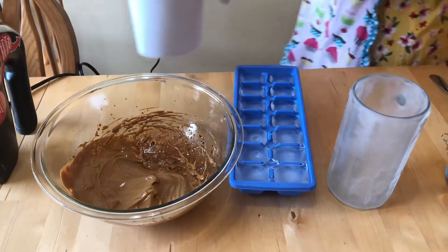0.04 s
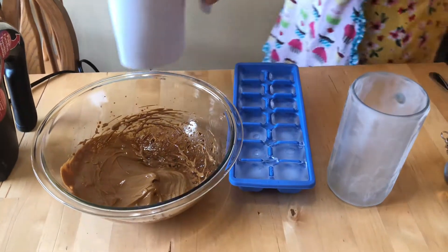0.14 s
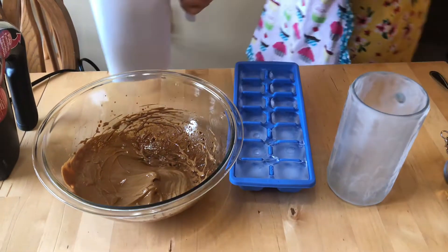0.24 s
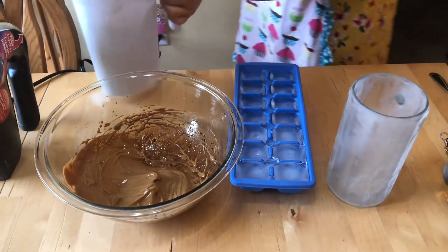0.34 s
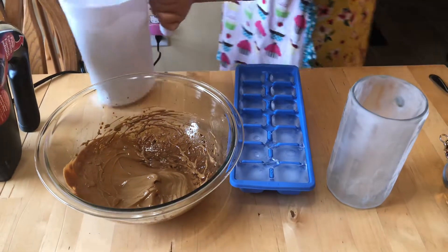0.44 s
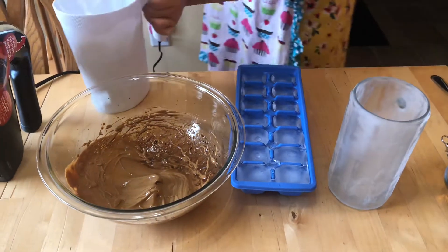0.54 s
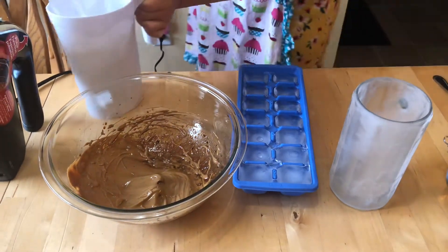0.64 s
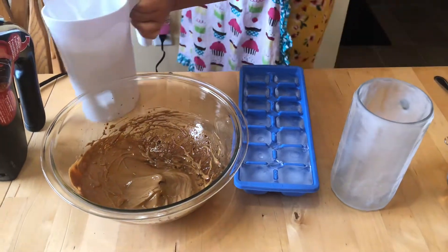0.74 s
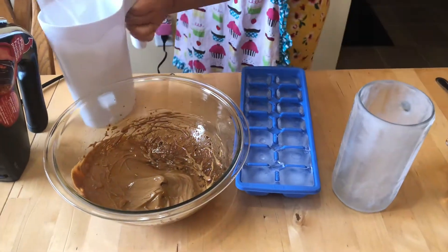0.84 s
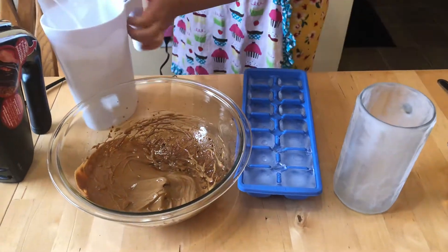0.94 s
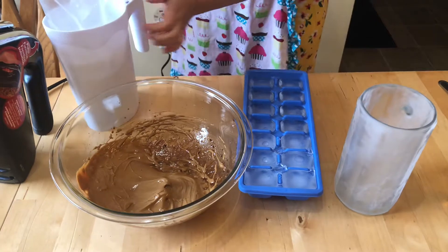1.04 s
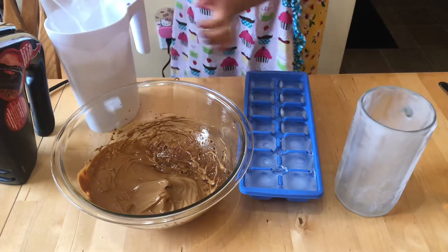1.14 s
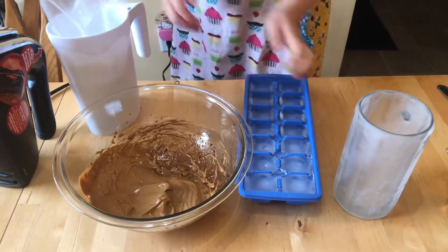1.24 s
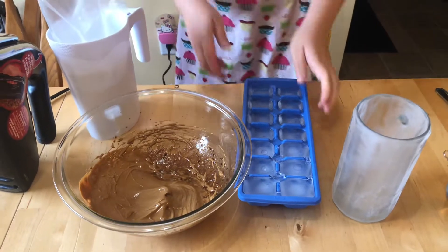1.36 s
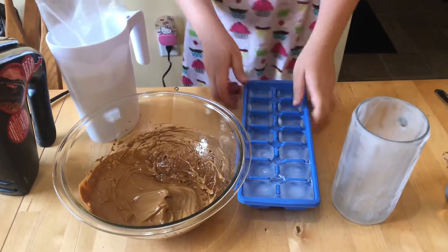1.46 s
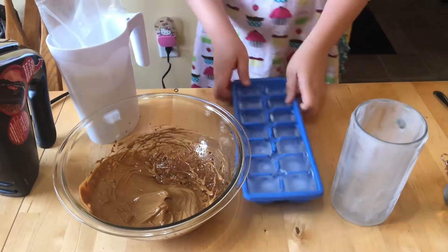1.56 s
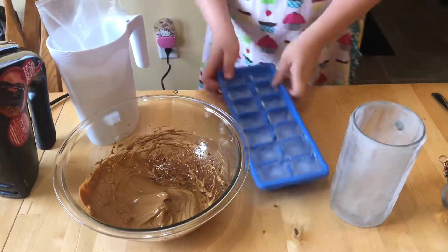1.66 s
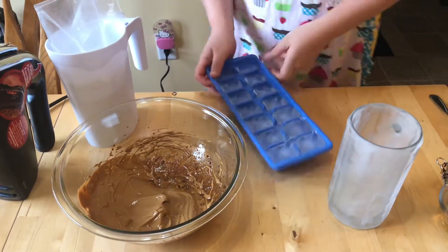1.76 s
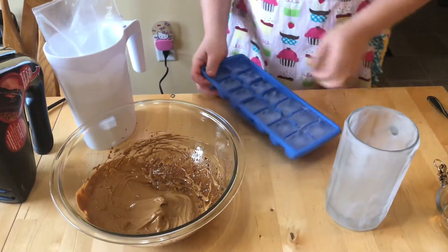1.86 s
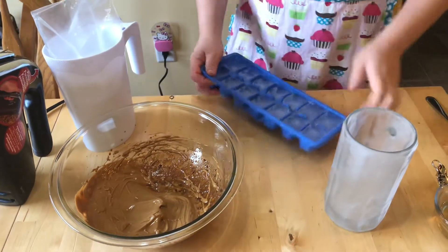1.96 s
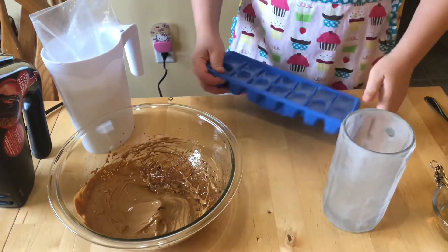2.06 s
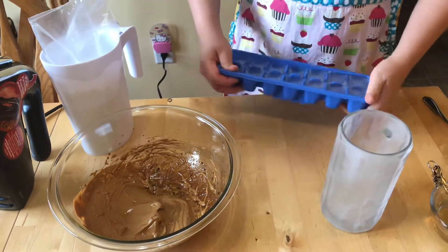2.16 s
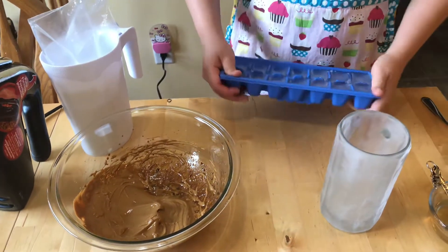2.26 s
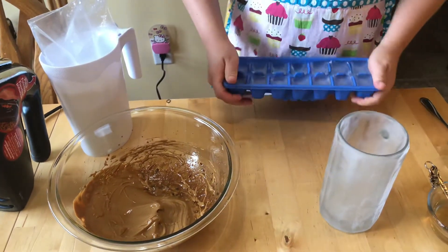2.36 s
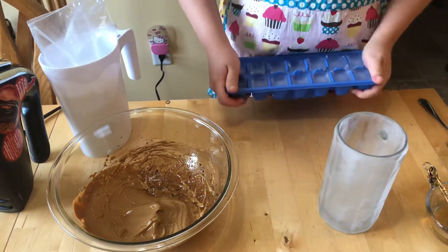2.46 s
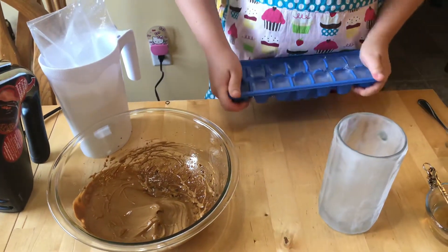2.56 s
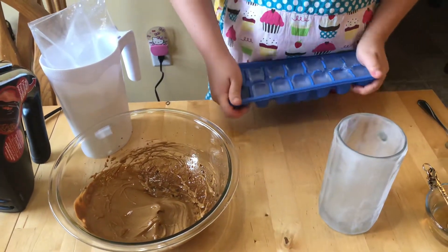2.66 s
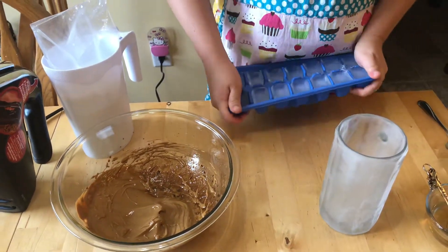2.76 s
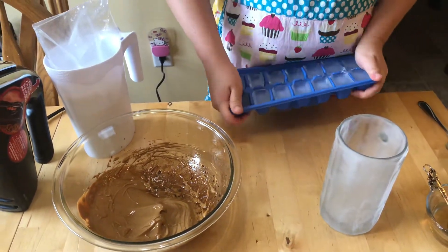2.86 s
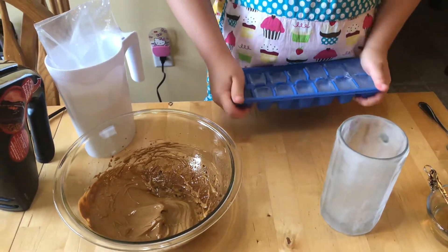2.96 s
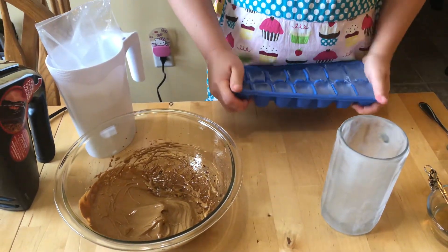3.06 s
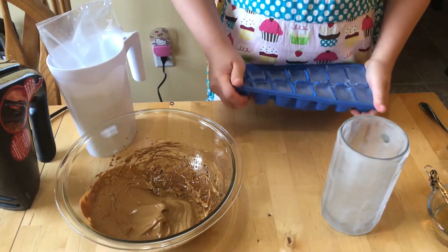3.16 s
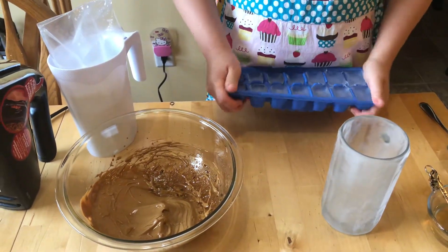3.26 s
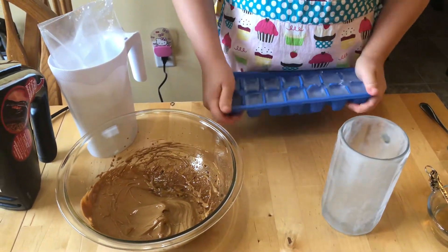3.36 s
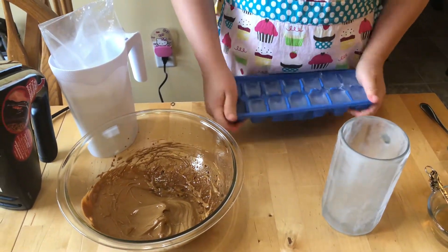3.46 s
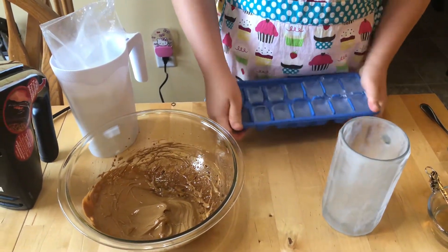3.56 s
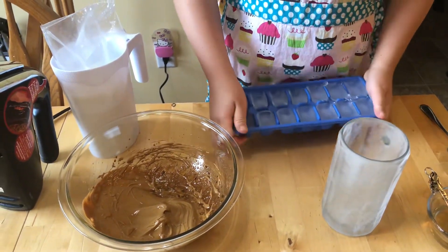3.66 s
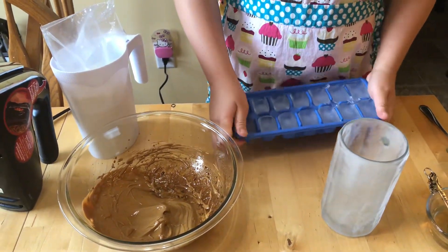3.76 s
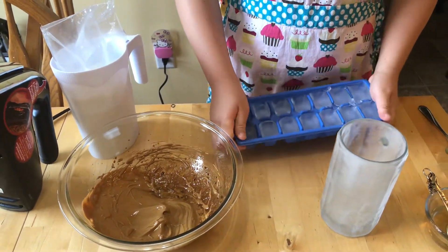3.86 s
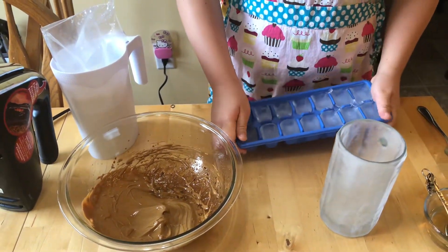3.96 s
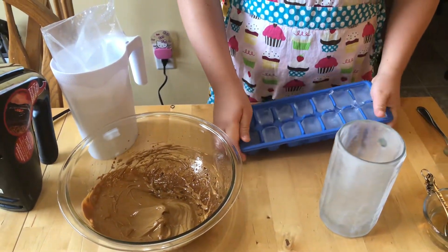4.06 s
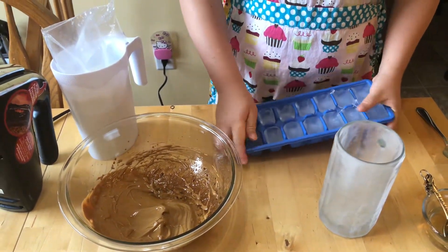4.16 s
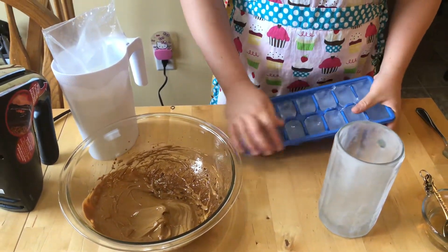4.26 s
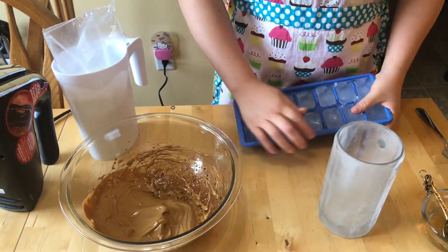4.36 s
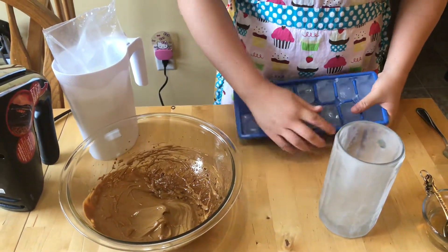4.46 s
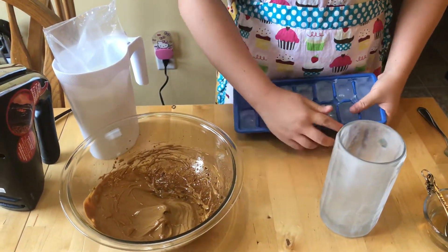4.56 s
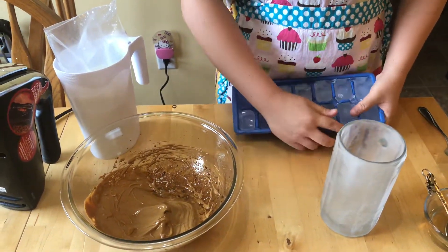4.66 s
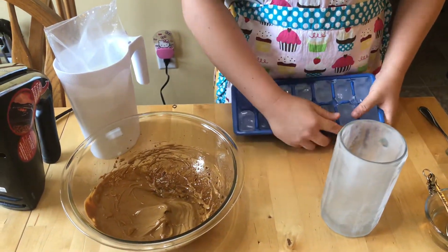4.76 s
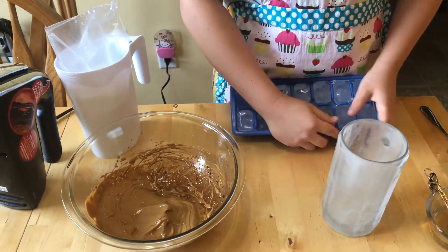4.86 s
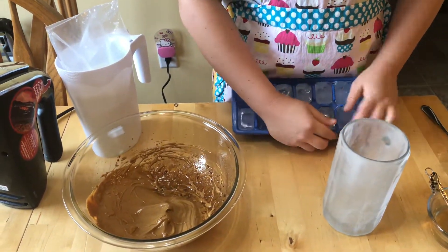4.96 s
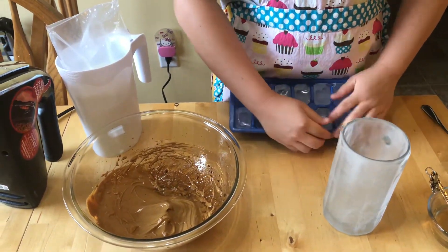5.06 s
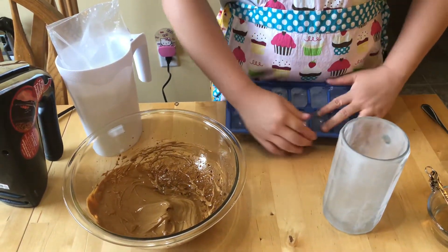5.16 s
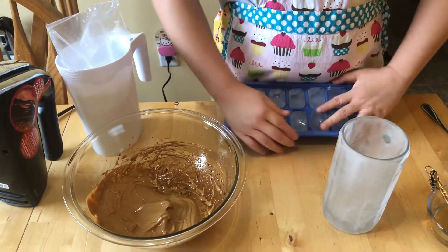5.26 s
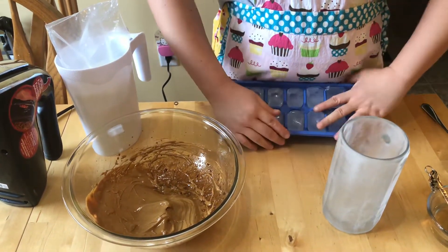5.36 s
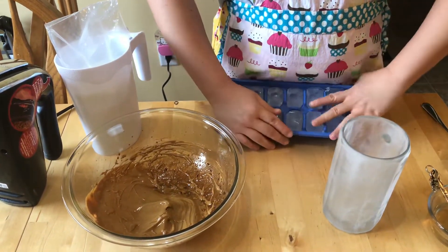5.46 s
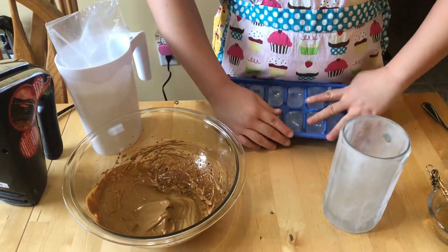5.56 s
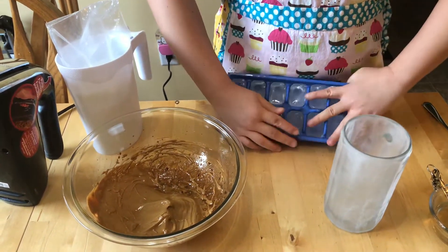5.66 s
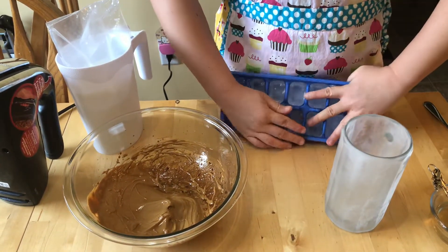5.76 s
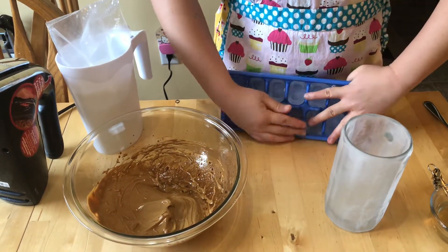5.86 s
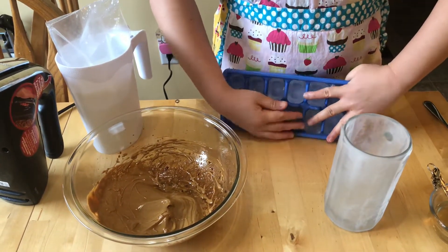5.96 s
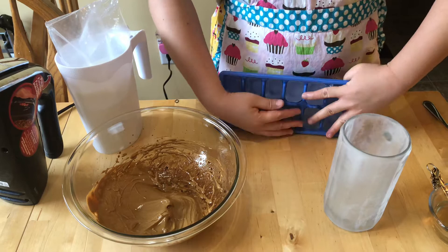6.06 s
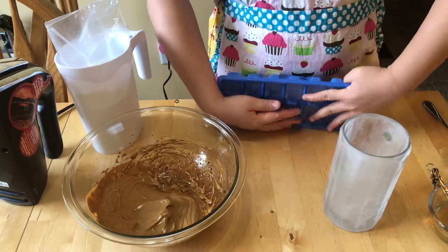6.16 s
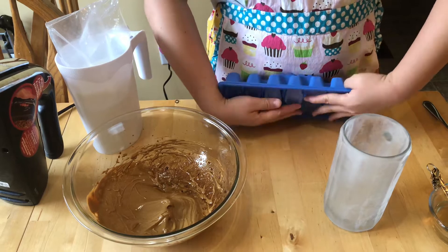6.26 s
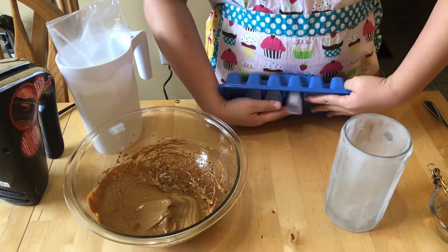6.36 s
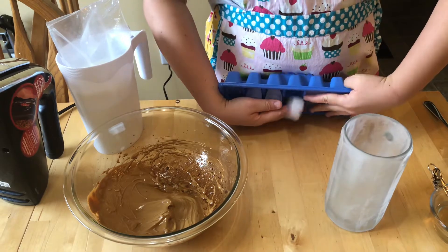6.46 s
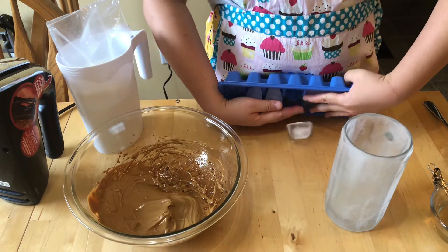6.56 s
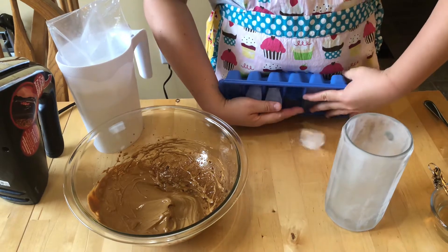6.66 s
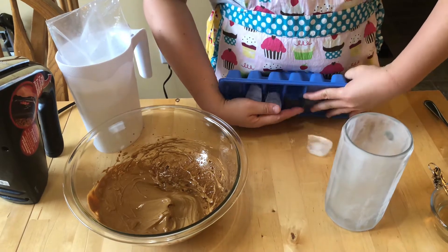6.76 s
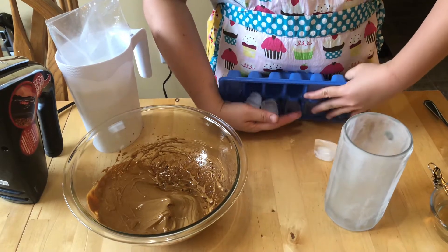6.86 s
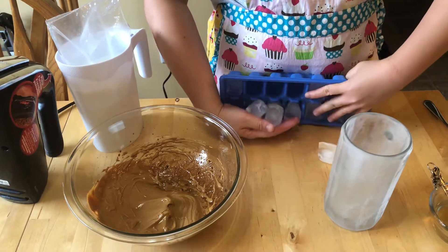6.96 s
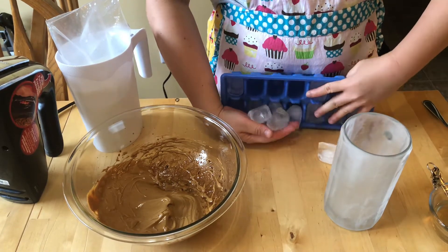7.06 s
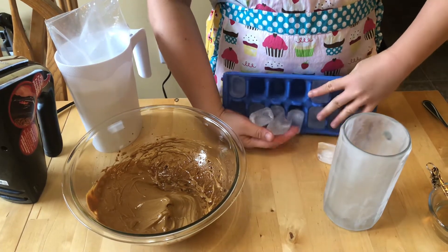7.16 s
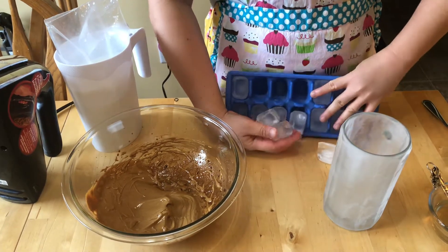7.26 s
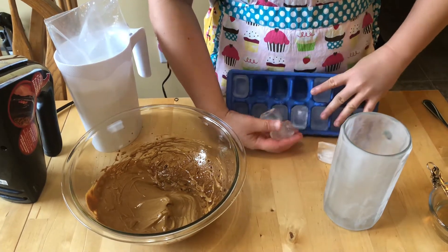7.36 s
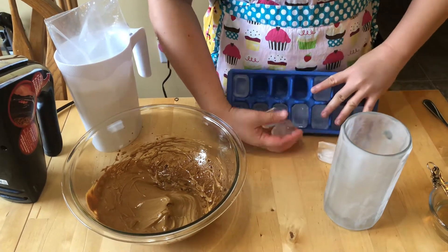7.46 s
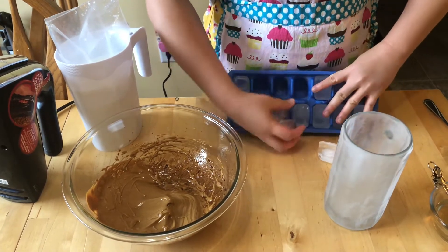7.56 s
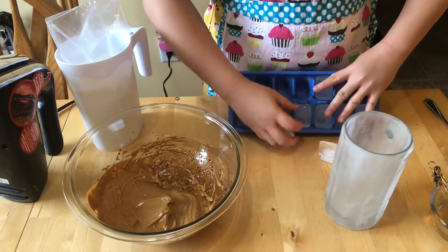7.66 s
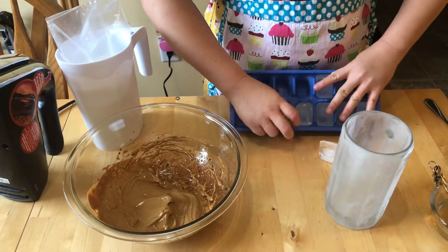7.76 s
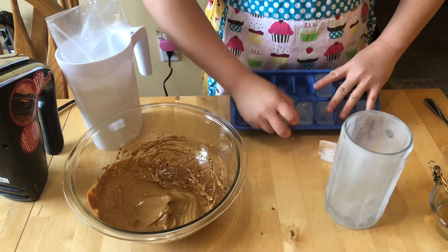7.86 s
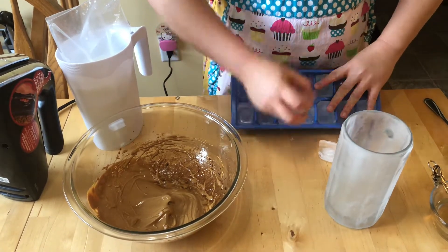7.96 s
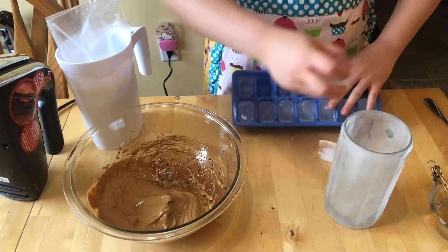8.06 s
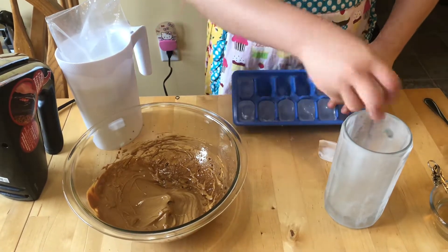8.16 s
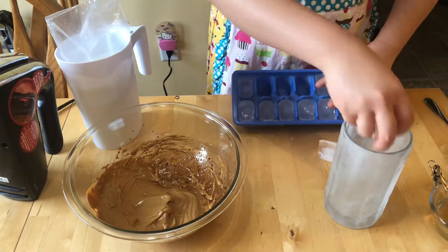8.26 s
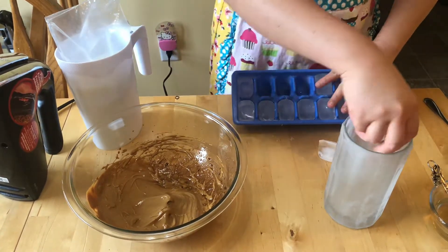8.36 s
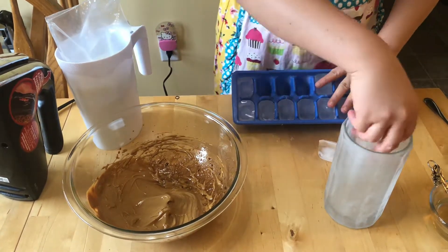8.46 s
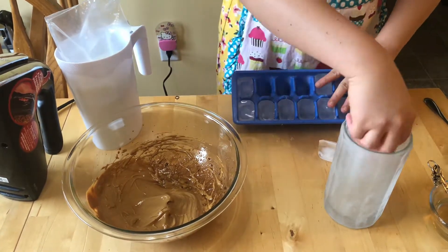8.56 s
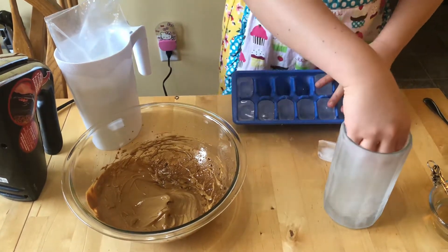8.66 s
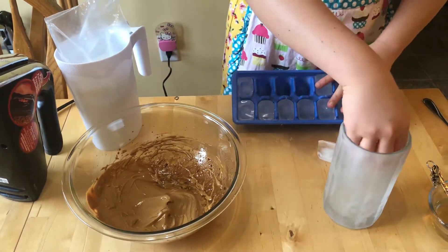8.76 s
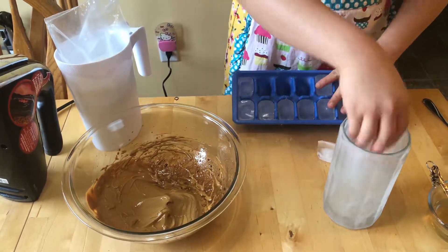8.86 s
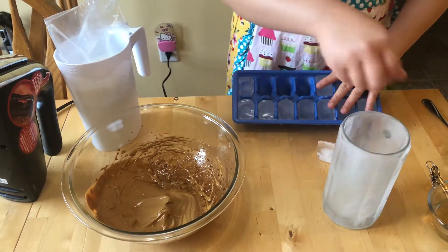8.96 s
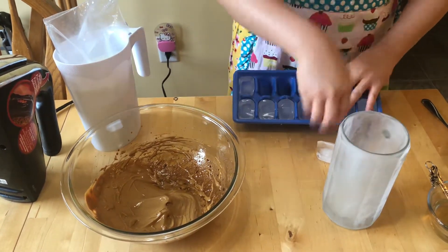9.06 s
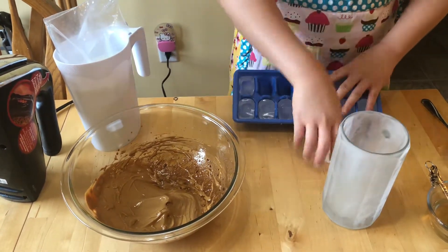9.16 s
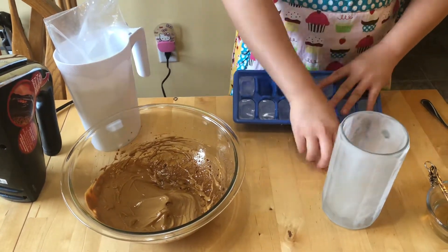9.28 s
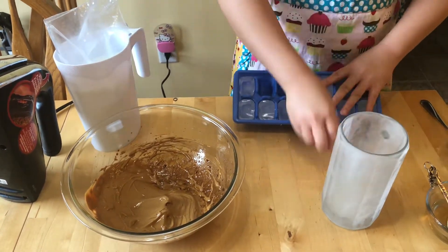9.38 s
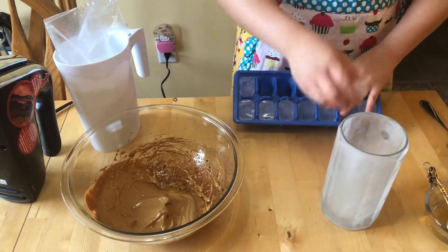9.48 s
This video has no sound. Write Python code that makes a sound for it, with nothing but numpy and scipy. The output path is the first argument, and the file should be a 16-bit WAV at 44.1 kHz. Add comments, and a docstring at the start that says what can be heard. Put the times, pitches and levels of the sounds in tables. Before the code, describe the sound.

Close, lightly echoing kitchen sound over steady low humming: a hollow jug knock with small rocking taps, plastic dragging on wood, then a sudden crisp crackle as ice breaks loose. Sparse ticks and soft plastic creaks while fingers pry; a heavy wooden knock with quick bounces as a cube falls; ice rattling in the tray; finally hard clacks and brief bright ringing of cubes landing in a glass.

```python
"""A kitchen with a humming fridge: a plastic jug is set on the wooden table, an ice tray is dragged near and
twisted so that the ice cracks, fingers pry the cubes out, one bounces on the table, the rest drop into a glass.
Sine tones and shaped noise make the fridge, noise grains the frost, filtered noise the rubbing and creaks;
short pushes and noise bursts through resonances make the jug, ice, wood and clacks; decaying sines ring the glass.
A diffuse echo surrounds all the handling and blows."""
import sys
import numpy as np
from scipy import signal
from scipy.fft import rfft, irfft, next_fast_len
from scipy.io import wavfile
from scipy.ndimage import uniform_filter1d, map_coordinates

SR = 44100
rng = np.random.default_rng(int(sys.argv[2]) if len(sys.argv) > 2 else 0)


def wav_record(signal):
    """Record a signal, one row per channel, as 16-bit PCM in the file named by sys.argv[1]."""
    frames = np.transpose(np.atleast_2d(signal))
    bounded = np.clip(frames, -1, 1)
    # unit amplitude maps onto the largest positive 16-bit level
    quanta = np.round(bounded * 32767).astype(np.int16)
    wavfile.write(sys.argv[1], SR, quanta)


N = 419832


def amp(db):
    """Decibels to gain."""
    return 10 ** (np.asarray(db) / 20)


def unit(x):
    """Scale to rms 1."""
    return x / np.sqrt(np.mean(x ** 2) + 1e-20)


def peak_one(x):
    """Scale to peak 1."""
    return x / np.abs(x).max()


def noise(count=N):
    """White noise."""
    return rng.standard_normal(count)


def along(points, hz):
    """Read (Hz, value) points on a log frequency axis."""
    point_hz, value = np.transpose(points)
    return np.interp(np.log(hz + 1), np.log(point_hz + 1), value)


def wobble(rate, count=N):
    """A smooth random curve, rate knots a second."""
    knots = noise(int(count * rate / SR) + 4)
    return map_coordinates(knots, [np.arange(count) * rate / SR])


def filtered(x, response):
    """Multiply the spectrum of x by a complex response of frequency."""
    m = next_fast_len(len(x) + 8192)
    return irfft(rfft(x, m) * response(np.fft.rfftfreq(m, 1 / SR)), m)[:len(x)]


def resonant(peaks):
    """Causal response of (Hz, width Hz, dB) resonances, summed with alternating sign."""
    def response(f):
        total = 0
        for k, (centre, width, db) in enumerate(peaks):
            damping = 1j * f * width
            total = total + (-1) ** k * amp(db) * damping / (centre * centre - f * f + damping)
        return total
    return response


def burst(t60, response, rise=0.00016):
    """A puff of dying noise through a response, peak 1."""
    t = np.arange(SR // 5) / SR
    envelope = amp(-60 * t / t60) * (1 - np.exp(-t / rise))
    return peak_one(filtered(envelope * noise(len(t)), response))


def blow(contact_s, response):
    """One short push, strongest at contact_s, through a response, peak 1."""
    t = np.arange(SR // 5) / SR
    return peak_one(filtered(t * np.exp(-t / contact_s), response))


def add(track, s, sound):
    """Mix a sound in at time s."""
    part = track[round(s * SR):][:len(sound)]
    part += sound[:len(part)]


SNAP_T60_S, SNAP_SHORTENS = 0.021, 0.011  # decay at -23.5 dB; about the share lost for each dB louder


def crack(db, hz):
    """A wide crack of a few ms; harder ones are shorter."""
    t60 = SNAP_T60_S * np.exp(-SNAP_SHORTENS * (db + 23.5))
    return amp(db) * burst(t60, resonant([(hz, 0.5 * hz, 0.5), (12000, 9000, -8)]))


# Fridge tones, before they waver: pitch_hz, peak_level_db
FRIDGE_TONES = [(57.8, -65.5), (59.2, -54.5), (188.4, -48.5), (247.6, -50), (301.5, -62)]
# Colour of the room noise: frequency_hz, density_db (relative, per Hz)
ROOM_NOISE = [(53, -23), (90, -19), (191, 0), (218, -3), (253, -14), (276, -12.5), (382, -26.5),
              (528, -18.5), (729, -28), (6170, -43), (7180, -44.5), (9500, -48.5), (15700, -47.5),
              (16100, -63)]
ROOM_NOISE_DB = -63  # rms above 400 Hz, clear of the hum, about which the level drifts


def fridge():
    """Compressor tones, the higher ones wavering more, over the noise of the room."""
    t = np.arange(N) / SR
    tones = np.zeros(N)
    for hz, db in FRIDGE_TONES:
        level = amp(db + hz / 130 * wobble(8))
        tones += level * np.sin(2 * np.pi * hz * t + hz / 300 * wobble(6))
    air = filtered(noise(), lambda hz: amp(along(ROOM_NOISE, hz)))
    air /= np.std(filtered(air, lambda hz: hz > 400))
    return tones + amp(ROOM_NOISE_DB + 1.4 * wobble(2.6)) * air


EDGE_DB = 20  # swell and fade times are for this many dB


def shape(s, swell, hold, fade):
    """Gain of one gesture, a value a millisecond: swell, hold, fade, straight in dB."""
    t = np.arange(N * 1000 // SR + 1) / 1000 - s
    before = np.maximum(-t, 0) / swell
    after = np.maximum(t - hold, 0) / fade
    return amp(-EDGE_DB * (before + after))


PATCHY_DB = 1.8  # the crackle changes colour from moment to moment


def patchy(x):
    """Random gain patches, about 1 kHz by 40 ms."""
    z = signal.stft(x, nperseg=256)[2]
    field = uniform_filter1d(rng.standard_normal(z.shape), size=7, axis=0)
    field = uniform_filter1d(field, size=14, axis=1)
    return signal.istft(z * amp(PATCHY_DB * unit(field)), nperseg=256)[1][:N]


# Crackle colour: frequency_hz, density_db (relative, per Hz)
FROST_COLOUR = [(710, -15.5), (1200, 1.5), (1770, 0.5), (2670, 6), (3070, 6), (4120, 7.5), (5630, 2.5),
                (8400, 2.5), (15600, -1), (16000, -31.5)]
# Level of the crackle's treble, above about 8 kHz: time_s, gain_db
FROST_TREBLE = [(0.2, -2), (1.2, -33.5), (1.5, -1), (1.75, 4.5), (2.1, 1), (2.5, 0.5), (3.1, 5.5),
                (3.7, 2.5), (4.3, -4), (4.9, -5.5), (5.6, 0.5), (6.2, -2), (6.7, -4.5), (7.3, 0.5),
                (7.8, -1.5), (9.3, 4.5)]
GRAINS_PER_S, GRAIN_T60_S, GRAIN_SPREAD_DB, HISS = 450, .003, 4.5, 1.3  # frost grains over a fine hiss


def frost_crackle():
    """Frost breaks in dense tiny grains of noise over a fine hiss, in changing colours."""
    t = np.arange(N) / SR
    size_db = np.minimum(GRAIN_SPREAD_DB * rng.exponential(size=N), 15)  # few grains are much larger
    grains = (rng.random(N) < GRAINS_PER_S / SR) * amp(size_db)
    sparks = np.convolve(grains, amp(-60 * t[:256] / GRAIN_T60_S))[:N]
    frost = filtered((sparks + HISS) * noise(), lambda hz: amp(along(FROST_COLOUR, hz)))
    frost = unit(patchy(frost))
    treble = filtered(frost, lambda hz: 1 / (1 + (8000 / (hz + 1)) ** 4))
    treble_gain = amp(np.interp(t, *np.transpose(FROST_TREBLE)))
    return frost + (treble_gain - 1) * treble


# Strokes and twists of the hands: full_strength_from_s, swell_s, hold_s, fade_s,
# crackle_db (ice and frost, before the treble curve), rub_db (plastic on wood, rms)
HAND_STROKES = [(0.167, 0.0072, 0.078, 0.085, -51, -59), (0.67, 0.4, 0.17, 0.13, -72, -55),
                (1.023, 0.033, .01, 0.25, -67, -81), (1.476, 0.15, 0.12, 0.098, -60, -67),
                (1.644, 0.15, 0.032, 0.22, -53, -46), (2.124, 0.0096, 0.04, 0.21, -55, -55.5),
                (2.36, 0.042, 0.085, 0.073, -58, -72.5), (2.422, 0.0051, 0.0034, 0.0075, -31.5, -56.5),
                (2.45, 0.038, 0.025, 0.046, -47.5, -65), (2.51, 0.018, 0.046, 0.017, -31, -59.5),
                (2.581, 0.011, 0.011, 0.064, -26.5, -37), (2.691, 0.002, 0.0081, 0.021, -21.5, -46.5),
                (2.708, 0.034, 0.0061, 0.094, -36.5, -45.5), (2.871, 0.025, 0.035, 0.026, -41.5, -41),
                (2.984, 0.12, 0.15, 0.042, -31.5, -46.5), (3.25, 0.06, 0.11, 0.061, -34.5, -48.5),
                (3.441, 0.036, 0.11, 0.064, -47, -62.5), (3.62, 0.056, 0.2, 0.16, -64.5, -73),
                (4.069, 0.002, 0.004, 0.12, -49.5, -56), (4.363, 0.066, .005, 0.047, -51.5, -65),
                (4.549, 0.12, .01, 0.28, -59.5, -58.5), (4.753, 0.012, 0.04, 0.32, -50.5, -54),
                (5.137, 0.08, 0.0084, 0.087, -63, -53), (5.486, 0.43, 0.14, 0.3, -54, -61),
                (5.854, 0.0048, 0.0054, 0.054, -47, -44), (6.03, .1, 0.099, 0.087, -58, -58.5),
                (6.255, 0.16, 0.03, 0.11, -37, -44), (6.526, 0.072, 0.31, 0.22, -44, -46.5),
                (7.088, 0.094, 0.11, 0.057, -49.5, -67), (7.265, 0.0024, 0.0067, 0.029, -40.5, -50),
                (7.284, 0.002, 0.0072, 0.017, -31, -47.5), (7.352, 0.068, 0.019, 0.11, -34.5, -48),
                (7.66, 0.06, .005, 0.051, -63, -46.5), (7.739, 0.003, 0.0068, 0.034, -68, -29),
                (7.785, 0.15, 0.0039, 0.053, -41.5, -54), (7.866, 0.05, .005, 0.082, -50, -63.5),
                (9.259, 0.036, 0.015, 0.099, -74.5, -45)]
# Weight put on the table: full_weight_from_s, hold_s, level_db (rms, added to the rest level)
TABLE_LEANS = [(0.176, 0.015, -44.5), (0.69, .05, -46), (1.578, 0.1, -41.5), (1.757, 0.025, -34),
               (2.135, 0.0082, -45.5), (2.707, 0.0091, -50), (4.081, 0.013, -48), (4.407, 0.018, -50.5),
               (4.876, 0.033, -43), (5.796, 0.011, -42), (7.3, 0.084, -44)]
LEAN_SWELL_S, LEAN_FADE_S, LEAN_REST_DB = 0.061, 0.035, -59  # the rest level drifts a little
# Resonances of the tray on the table top: pitch_hz, width_hz, gain_db
TRAY_ON_WOOD = [(510, 41, 6.5), (663.5, 27.7, 13), (824, 220, 8), (1153, 134, 9), (1530, 700, -1)]
# Low modes of the table: pitch_hz, width_hz, gain_db
TABLE_LOW_MODES = [(135.7, 8.4, 1), (281.4, 13, -7.5), (356.3, 30, -10.5)]


def handling():
    """Ice and frost crackle; the tray rubs the wood in uneven slips; leaning stirs the table's low modes."""
    t = np.arange(N) / SR
    crackle = sum(amp(row[4]) * shape(*row[:4]) for row in HAND_STROKES)
    friction = sum(amp(row[5]) * shape(*row[:4]) for row in HAND_STROKES)
    pressure = sum(amp(db) * shape(s, LEAN_SWELL_S, hold, LEAN_FADE_S) for s, hold, db in TABLE_LEANS)
    # from a value a millisecond to a value a sample
    crackle, friction, pressure = (np.interp(t, np.arange(len(gain)) / 1000, gain)
                                   for gain in (crackle, friction, pressure))
    weight = amp(LEAN_REST_DB + 1.5 * wobble(11.0)) + pressure
    rub = filtered(amp(2.8 * wobble(90)) * noise(), resonant(TRAY_ON_WOOD))
    lean = filtered(noise(), resonant(TABLE_LOW_MODES))
    return crackle * frost_crackle() + friction * unit(rub) + weight * unit(lean)


# Jug set down, rocking: start_s, knock_peak_db
JUG_KNOCKS = [(0.4953, -9), (0.556, -24), (0.653, -24)]
# Resonances of the jug's body: pitch_hz, width_hz, gain_db (before its treble roll-off)
JUG_MODES = [(59.6, 53, -9), (131.7, 7.4, 6), (270, 48, 0.5), (375, 170, -1.5), (586, 104, 9.5),
             (726, 150, 7), (980, 610, -0.5), (1350, 390, -5), (1496, 61, -15), (1870, 120, -14),
             (2200, 150, -26)]


def jug():
    """The hollow jug knocks on the wood and booms on; its rim adds a short dry tap."""
    out = np.zeros(N)
    body = lambda f: resonant(JUG_MODES)(f) / (1 + 1j * f / 2500)
    rim = lambda f: resonant([(1800, 1300, 0.5)])(f) ** 2
    for s, db in JUG_KNOCKS:
        add(out, s, amp(db) * blow(.00006, body))
        add(out, s + 0.0055, amp(db - 10.5) * burst(0.15, body, rise=0.0018))
        add(out, s, amp(db - 20) * burst(0.011, rim))
    return out


# The tray creaks under the fingers or against the wood: start_s, length_s, from_hz, to_hz, width_hz,
# level_db (rms before the rounded fade in and out), throb_db (depth)
TRAY_CREAKS = [(0.681, 0.18, 954, 1000, 700, -53, 2), (1.54, 0.3, 666, 657, 40, -50.5, 1.5),
               (1.754, .035, 1594, 1560, 300, -52, -1), (2.873, 0.026, 1070, 1005, 249.4, -35, 5),
               (2.875, 0.041, 516, 516, 40.2, -44, 22), (3.042, 0.13, 1050, 1112, 402, -41.5, 2),
               (5.119, 0.24, 744, 749, 150, -59.5, 5), (5.542, 0.14, 697, 725, 211, -44, 2),
               (5.995, 0.11, 1880, 1910, 350, -57.5, -1), (6.069, 0.12, 2500, 2650, 1310, -48, 1.5),
               (6.223, 0.087, 744, 837, 136.5, -41, 4), (6.338, 0.031, 840, 840, 254.5, -43.5, 3),
               (7.091, 0.24, 699, 688, 120, -56, 7), (7.619, 0.19, 1288, 1500, 400, -42.5, -1),
               (9.242, 0.081, 1400, 886, 500, -49, 4)]


def creaks():
    """Stick-slip: a narrow wavering tone that comes in uneven throbs."""
    out = np.zeros(N)
    for s, length, from_hz, to_hz, width_hz, db, throb_db in TRAY_CREAKS:
        u = np.linspace(0, 1, int(length * SR))
        throbs = amp(throb_db * wobble(47.0, count=len(u)))
        band = filtered(noise(len(u)) * throbs, lambda f: np.exp(-(2 * f / width_hz) ** 2))
        carrier = np.sin(2 * np.pi * np.cumsum(from_hz + (to_hz - from_hz) * u) / SR)
        tone = unit((unit(band) + 40 / width_hz) * carrier)  # narrow creaks keep more steady tone
        add(out, s, amp(db) * np.sin(np.pi * u) ** 0.34 * tone)
    return out


# Ice snaps and ticks: start_s, peak_db, centre_hz, tray_knock_db (relative to the snap)
ICE_SNAPS = [(1.2572, -46, 7500, -27), (1.473, -43.5, 5950, 0), (1.729, -56.5, 3000, 17),
             (1.7642, -29, 3400, -25), (1.862, -35.5, 8740, -6), (2.3407, -23, 3900, -8),
             (2.415, -26.5, 7000, -21), (2.4228, -18.5, 13900, -34), (2.441, -27, 3880, -15),
             (2.4596, -17.5, 5010, -23.5), (2.465, -23.5, 5500, -25), (2.489, -20, 4500, -14),
             (2.4983, -17.5, 5500, -24), (2.5033, -14, 7680, -22), (2.512, -12, 5000, -34),
             (2.53, -14.5, 8000, -18), (2.542, -15.5, 7000, -25), (2.5194, -10, 11470, -28.5),
             (2.5493, -12.5, 8800, -38), (2.571, -19.5, 10000, -17), (2.581, -11, 8000, -28),
             (2.587, -11.5, 6000, -11), (2.6, -23.5, 7000, -8), (2.641, -22, 8000, -29),
             (2.577, -10.5, 11570, -31), (2.6498, -16, 7930, -8.5), (2.678, -15.5, 8400, -18),
             (2.6913, -8.5, 10400, -26), (2.697, -17.5, 6000, -4.5), (2.713, -20, 5000, 3),
             (2.876, -24, 3600, -10), (2.8605, -26.5, 9100, -8), (2.9595, -26.5, 8470, -36),
             (2.992, -17, 8070, -36), (3.2118, -29, 6000, -5.5), (3.029, -21, 6040, -29),
             (3.136, -19.5, 6910, -8), (3.285, -20, 5900, -31), (3.232, -25.5, 4000, -14),
             (3.3335, -21.5, 8100, -33), (3.428, -32.5, 3350, -25), (3.5924, -30, 4080, -17),
             (3.6204, -30.5, 4470, -20), (3.695, -38, 1900, -6), (3.728, -34.5, 5770, -16),
             (3.796, -42, 5970, -13), (4.9, -41.5, 8060, -17), (4.0561, -18, 4330, -22),
             (4.2699, -42, 9700, -13), (4.3614, -37, 13420, -17), (4.746, -42.5, 3600, -20),
             (4.8392, -33.5, 4160, -10), (5.1345, -35, 4170, -3.5), (5.3062, -30.5, 6670, -9.5),
             (5.442, -35, 4200, -27), (5.5177, -30.5, 3760, -30), (5.7042, -32, 4370, -12.5),
             (5.77, -37.5, 3430, -2.5), (5.8561, -19.5, 3370, -29), (5.9792, -35.5, 4400, -13),
             (5.876, -31, 6500, -16), (6.17, -34.5, 14000, -24.5), (6.187, -31, 8000, -14),
             (6.238, -25.5, 6000, -24), (6.288, -20, 8000, -13), (6.2253, -25.5, 4540, -1.5),
             (6.259, -20.5, 12900, -26), (6.2813, -25.5, 4400, -21), (6.321, -25, 2300, -4),
             (6.4646, -37.5, 3800, -26), (6.661, -18.5, 5400, 2), (6.668, -24, 4000, -2),
             (6.777, -16, 6500, -0.5), (7.247, -18.5, 4000, -10), (7.394, -18, 4500, -11.5),
             (7.5, -37, 3500, -20), (7.541, -40.5, 3500, 7), (7.626, -35, 4000, -3),
             (6.8225, -31, 7420, -14), (7.333, -23.5, 4160, -15), (7.4038, -17, 3930, -20),
             (7.617, -29, 3980, -5), (7.7089, -28.5, 4810, -1), (7.7734, -24.5, 8250, -12),
             (7.996, -48, 3740, -30.5), (9.285, -44.5, 9000, -32), (9.381, -46, 10140, -29)]


def snaps():
    """Each snap of the ice is a wide crack that knocks the tray."""
    out = np.zeros(N)
    tray = lambda f: resonant([(1000, 1200, 0.5)])(f) ** 2
    for s, db, hz, knock_db in ICE_SNAPS:
        add(out, s, crack(db, hz))
        add(out, s, amp(db + knock_db) * burst(0.026, tray))
    return out


# Knocks on the wood, from cubes, tray and hand: start_s, peak_db, hardness_db (upper modes),
# tick_db (peak), rattle_db (wood after the blow, relative to it), spot_hz (mode under the struck spot)
WOOD_KNOCKS = [(6.5347, 1, -6.5, -39.5, -11, 1833), (6.631, -6.5, -8, -17.5, -8, 2420),
               (6.709, -13.5, -3, -21, -7.5, 1005), (6.741, -15.5, -6, -25, -2, 2420),
               (6.904, -9.5, -12.5, -22, -15.5, 710), (6.980, -14, -8.5, -22, -12.5, 710),
               (7.253, -20, -26, -37, -15, 680), (7.285, -24, -20, -22.5, -12, 690),
               (7.366, -21.5, -16, -13, -22, 690), (7.648, -25.5, -6, -29, -14, 710),
               (7.661, -29, -14.5, -32, -14.5, 710), (7.740, -22, -4.5, -38.5, -11, 736),
               (9.253, -34.5, -8, -49.5, -9, 1130)]
# Modes of the table top: pitch_hz, width_hz, gain_db (before hardness and scatter)
TABLE_MODES = [(135, 5.1, 4.5), (350, 108, 0), (514, 70, 2), (580, 80, 4), (682, 55, 4.5), (926, 130, 3),
               (1320, 170, 1), (1778, 160, 14), (1990, 180, 12), (2533, 99, 8), (2930, 560, -2.5),
               (3630, 700, -10.5), (4770, 520, -12)]
# Colour of the wood rattling on, before hardness: frequency_hz, density_db (relative, per Hz)
RATTLE_COLOUR = [(120, -36), (200, -15), (661, 1), (904, -12), (1670, -4), (1820, -6), (2950, -13),
                 (3540, -25), (6000, -41), (13200, -120)]
CONTACT_S, RATTLE_T60_S = .00008, 0.14  # push on the wood peaks after this; decay of the rattle
SCATTER_DB = 2.5  # random scatter of the mode levels from blow to blow
SPOT_WIDTH_HZ, SPOT_TONE_DB = 100, 12  # the mode that lies under the struck spot


def wood_knocks():
    """A harder knock excites the table's upper modes, the struck spot adds its own, the wood rattles on."""
    out = np.zeros(N)
    for s, db, hard_db, tick_db, rattle_db, spot_hz in WOOD_KNOCKS:
        modes = [(hz, width, level + hard_db * (hz > 1400) + SCATTER_DB * rng.standard_normal())
                 for hz, width, level in TABLE_MODES]
        spot = resonant([(spot_hz, SPOT_WIDTH_HZ, SPOT_TONE_DB)])
        wood = lambda f: resonant(modes)(f) + spot(f)
        rattle = lambda f: amp(along(RATTLE_COLOUR, f) + (hard_db + 10) * np.clip(f / 1000 - 1, 0, 1))
        add(out, s, amp(db) * blow(CONTACT_S, wood))
        add(out, s + .005, amp(db + rattle_db) * burst(RATTLE_T60_S, rattle, rise=0.0025))
        add(out, s, crack(tick_db, hz=3580))
    return out


# Cubes against the glass: start_s, peak_db, ring_db and foot_thud_db (relative to the peak),
# hardness_db_per_octave, cube_tone_hz, low_pair_db (two lowest modes: strong at the rim, weak at the foot)
GLASS_CLINKS = [(8.497, -32, 12, -2, -3.5, 4140, 2), (8.5563, -22.5, 4, -12, -3, 3730, -5),
                (8.582, -2, -13.5, -5.5, -2, 3930, -18), (8.644, -16, -18, -4.5, 5.5, 2900, -20),
                (8.706, -26.5, -19, 4, -3.5, 4000, -11), (8.7797, -39, -10.5, -3, 3, 3500, -10),
                (8.828, -24, 0, -2, -4.5, 3430, -7), (8.836, -1, -28, -19.5, 1, 4250, -3),
                (8.8462, -7, -17.5, -12, -5.5, 4100, -1), (8.8878, -23, -26, -4, 0, 5800, 0),
                (8.9, -15.5, -14.5, -8.5, 3.5, 5100, 1), (8.9499, -13, -11.5, -21, -1.5, 2640, -7),
                (8.962, -8.5, -17, -9, 2, 2430, -2), (8.969, -33, 0, -17.5, -8, 3350, -15),
                (8.975, -26, -18, 0, -1, 1420, -20), (9.129, -42.5, -13, -7, 4, 3380, 0),
                (9.158, -40, -19.5, 2, 1.5, 3280, -5), (9.19, -41, -25.5, -1, -2, 3470, -5)]
# Clack of ice: pitch_hz, width_hz, gain_db (before hardness)
ICE_CLACK = [(1490, 210, -14), (2280, 390, -10.5), (3620, 210, 0.5), (4450, 250, -2), (5000, 1000, -9.5),
             (9850, 3400, -20)]
SKITTER_DB, SKITTER_T60_S = -24, 0.16  # the cube sliding on round the glass after each clack


def glass_clacks():
    """Each cube clacks at its own tone, ticks, skitters on and thuds through the foot into the table."""
    out = np.zeros(N)
    skitter = resonant([(2000, 2000, -4.0), (9970, 14000, 2.5)])
    foot = resonant([(59.7, 73, -12.0), (126.4, 21, -1.0), (236.0, 140, 3.0),
                     (363, 270, 2.5), (716, 117, 2.0), (1492, 190, -6.0)])
    for s, db, _, thud_db, hard_db, tone_hz, _ in GLASS_CLINKS:
        tone = resonant([(tone_hz, 450, 8)])
        clack = lambda f: resonant(ICE_CLACK)(f) * ((f + 1) / 2700) ** (hard_db / 6) + tone(f)
        add(out, s, amp(db) * burst(0.0035, clack, rise=0.00021))
        add(out, s, amp(db + SKITTER_DB) * burst(SKITTER_T60_S, skitter, rise=.003))
        add(out, s, crack(db - 9.5, tone_hz))
        add(out, s, amp(db + thud_db) * burst(0.081, foot, rise=0.0008))
    return out


FLUTTER_DB, FLUTTER_RAD = 4, .55  # rattling ice unsettles the ring


def ring(modes, scatter_db, seconds, damped_at):
    """One blow, peak 1: fluttering modes at new strengths, dying once something rests on the wall."""
    t = np.arange(int(seconds * SR)) / SR
    hz, db, t60 = np.transpose(modes)[:, :, None]
    flutter = np.array([wobble(60.3, count=len(t)) for _ in modes])
    strength_db = db + scatter_db * rng.standard_normal(hz.shape)
    level = amp(strength_db + FLUTTER_DB * flutter - 60 * t / t60)
    x = (level * np.sin(2 * np.pi * hz * t + FLUTTER_RAD * flutter)).sum(0)
    x *= 1 - np.exp(-t / 0.0028)
    x *= amp(-60 * np.maximum(t - damped_at, 0) / .03)
    return peak_one(x)


# Pitch of each mode of the glass wall: pitch_hz
GLASS_PITCHES = [2595, 2674, 3352, 5387, 6468, 7395, 7806, 10250, 10700, 11710, 12390, 13660, 14070]
# The same modes in order: level_db (before the drive of each clink), t60_s (until damped)
GLASS_MODES = [(-14, .25), (-8, 0.35), (-25, 0.33), (-18, 0.31), (-21, 0.15), (-25.5, 0.092), (-21, 0.26),
               (-11.5, 0.09), (-19, 0.15), (-25, .12), (-23, 0.16), (-25.5, 0.18), (-18, 0.43)]
LOW_PAIR_TOP_HZ = 2800  # the two lowest modes lie under this
NEAR_DB, NEAR_HZ = 14, 120  # a mode close to the cube's own tone is driven harder


def glass_wall():
    """Each cube rings the wall of the glass; harder contacts favour the treble."""
    out = np.zeros(N)
    for s, db, ring_db, _, hard_db, tone_hz, low_db in GLASS_CLINKS:
        modes = []
        for hz, (level, t60) in zip(GLASS_PITCHES, GLASS_MODES):
            level = level + hard_db * np.log2(hz / 2700)
            level += low_db * (hz < LOW_PAIR_TOP_HZ)
            level += NEAR_DB * (abs(hz - tone_hz) < NEAR_HZ)
            modes.append((hz, level, t60))
        # the next heavy cube stills the glass
        landing = min([row[0] for row in GLASS_CLINKS if row[0] > s and row[1] > -8] + [s + 1])
        add(out, s, amp(db + ring_db) * ring(modes, scatter_db=1.5, seconds=.6, damped_at=landing - s))
    return out


# Decay of the kitchen's echo: frequency_hz, t60_s
ROOM_DECAY = [(150, 0.89), (500, 0.49), (2000, 0.42), (6000, 0.28), (14000, 0.034)]


def kitchen(x):
    """Diffuse echo, each frequency dying at its own speed; a fresh random pattern is drawn every 0.2 s."""
    out, step = np.zeros(N), SR // 5
    for start in range(0, N, step):
        hz, t, z = signal.stft(noise(SR // 2), SR, nperseg=256)
        decay = amp(-60 * t / along(ROOM_DECAY, hz)[:, None])
        tail = signal.istft(z * decay, SR, nperseg=256)[1]
        piece = x[start:start + 2 * step]
        # overlapping pieces fade into each other
        piece = piece * signal.get_window("hann", 2 * step)[:len(piece)]
        add(out, start / SR + .004, signal.fftconvolve(piece, tail / np.linalg.norm(tail)))
    return out


def scene():
    """Blows and handling in the kitchen, over the fridge."""
    hands = handling() + creaks()
    blows = jug() + snaps() + wood_knocks() + glass_clacks()
    wall = glass_wall()
    echo = kitchen(amp(-7.0) * blows + amp(-3.5) * wall + amp(-10.5) * hands)
    return (blows + wall + hands + echo + fridge())[None]


TOP_HZ = 16800  # upper limit of the sound


def record(dry):
    """Rolls off the deepest bass and keeps nothing above TOP_HZ."""
    return filtered(dry[0], lambda hz: (hz < TOP_HZ) * (1j * hz / (45 + 1j * hz)) ** 2)[None]


dry = scene()
out = record(dry)
wav_record(out)
```